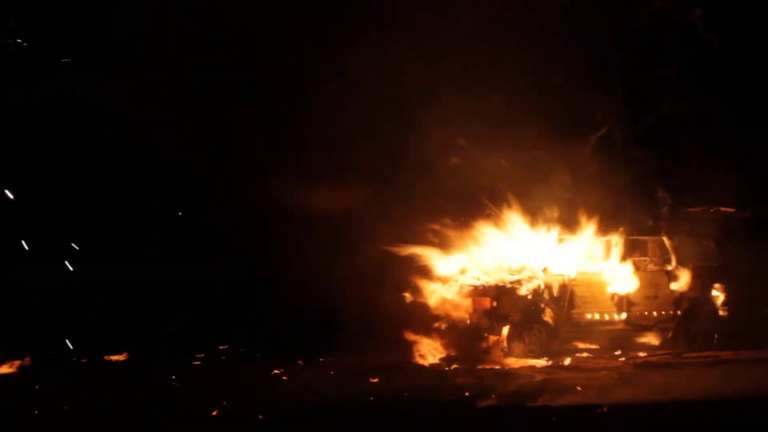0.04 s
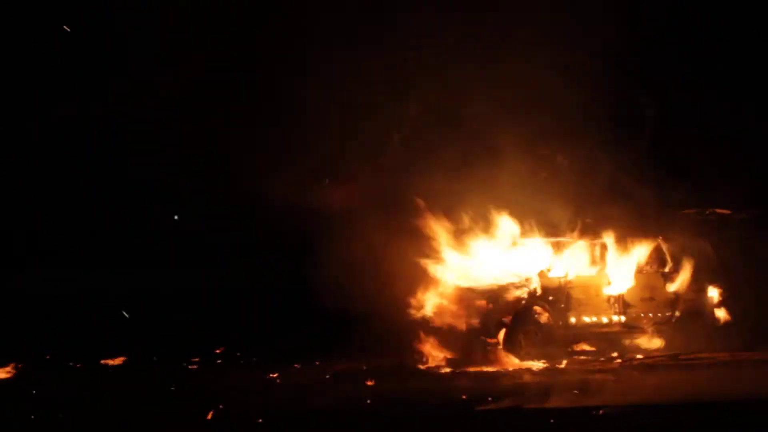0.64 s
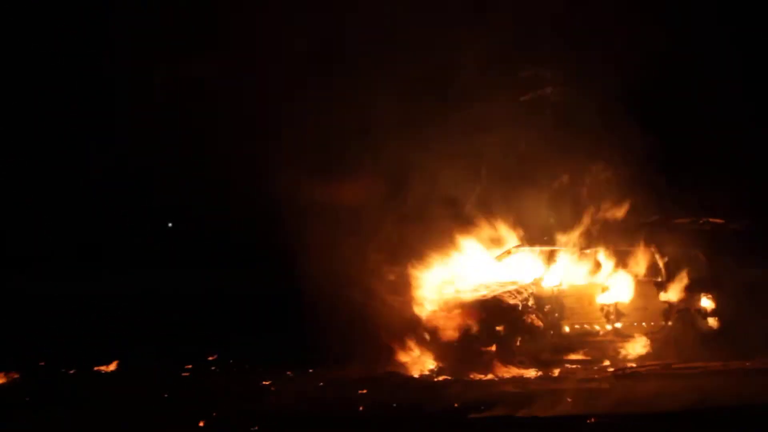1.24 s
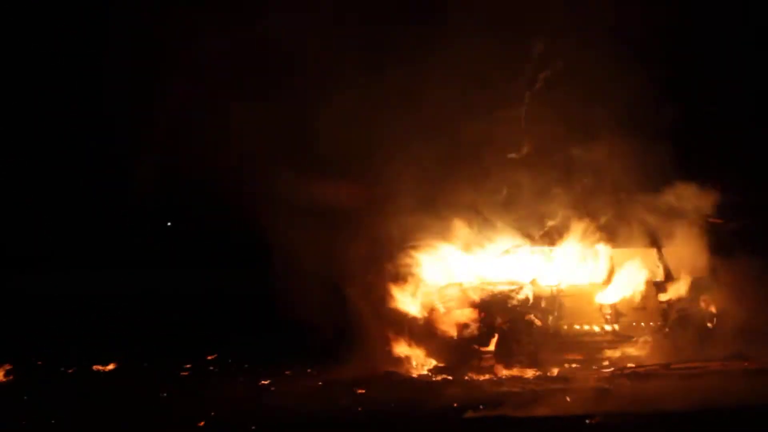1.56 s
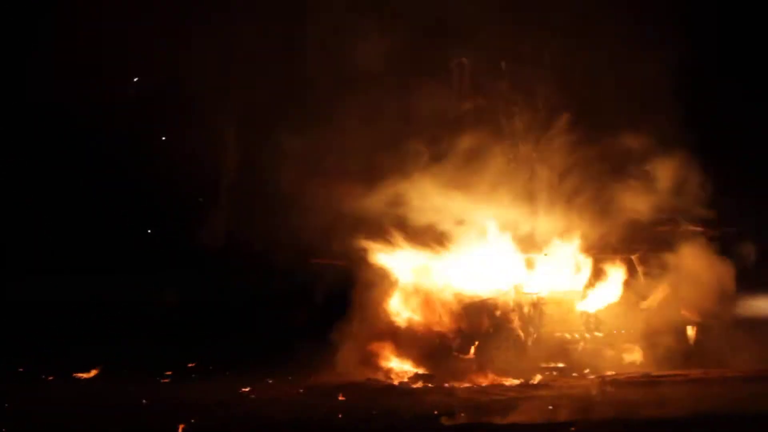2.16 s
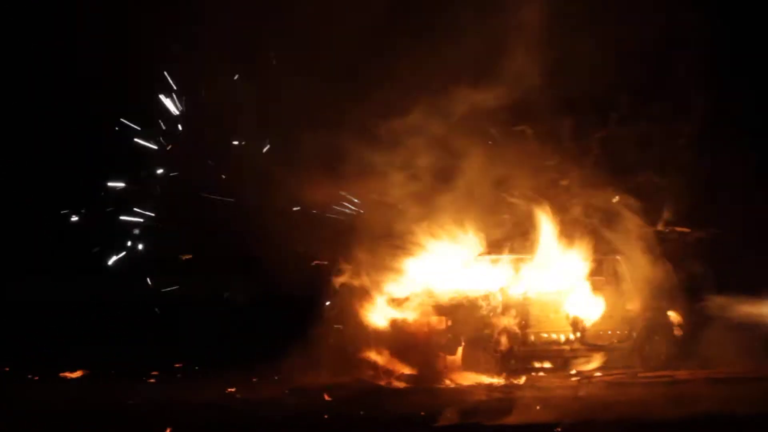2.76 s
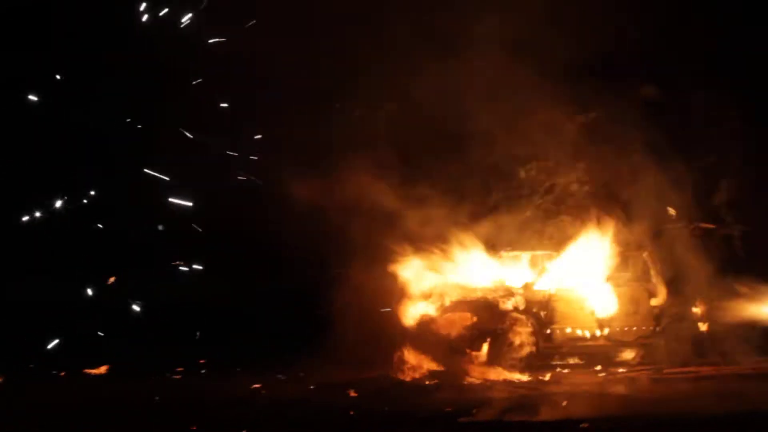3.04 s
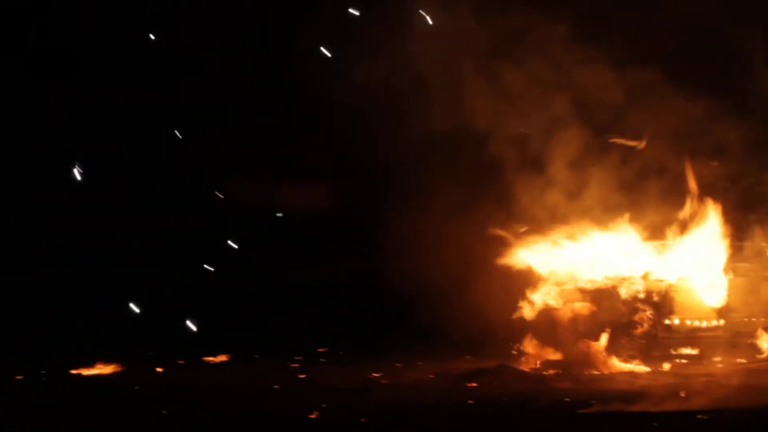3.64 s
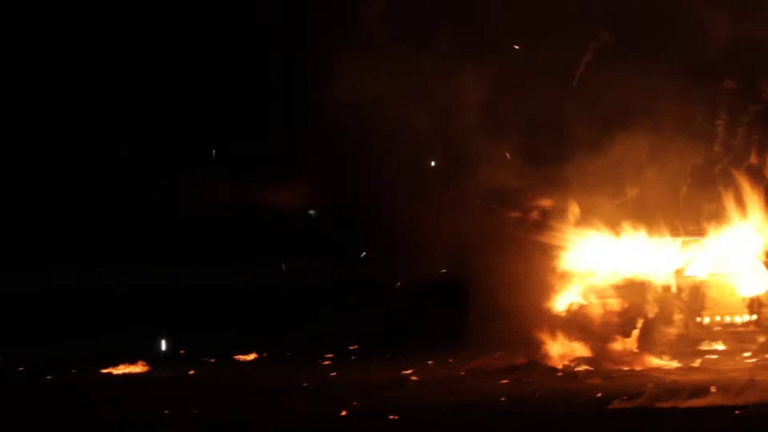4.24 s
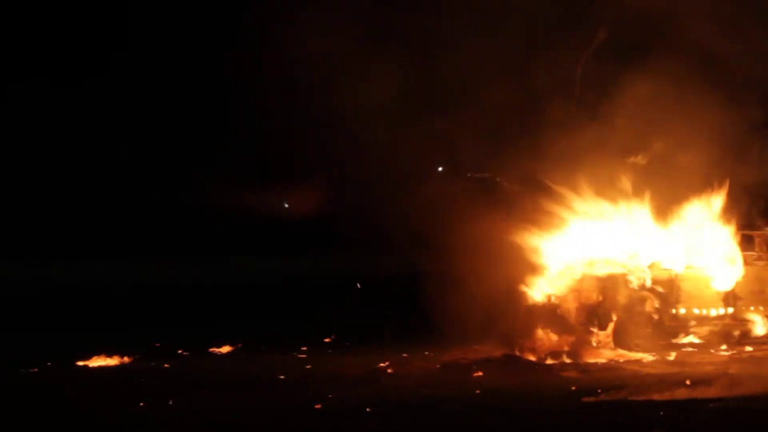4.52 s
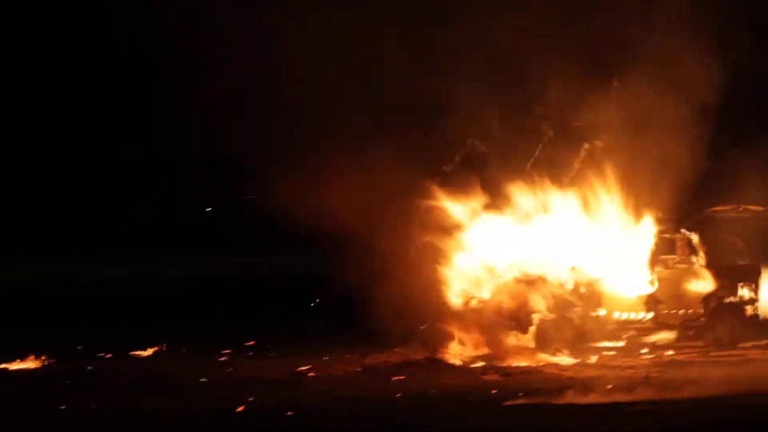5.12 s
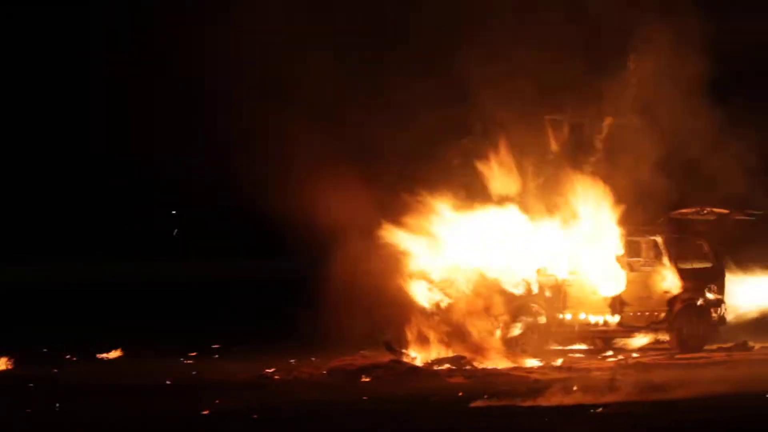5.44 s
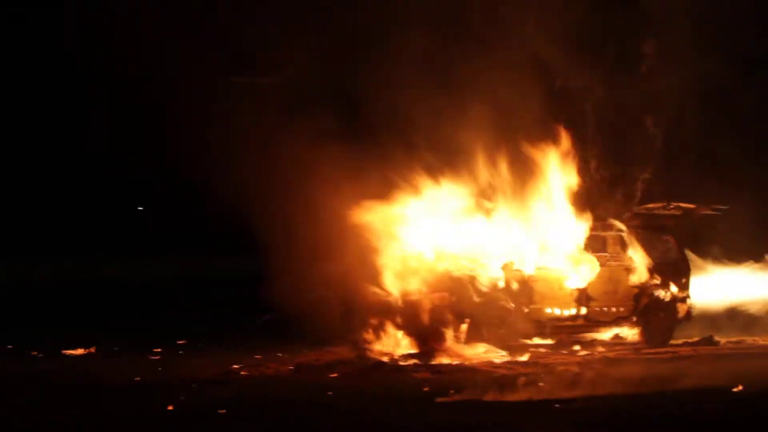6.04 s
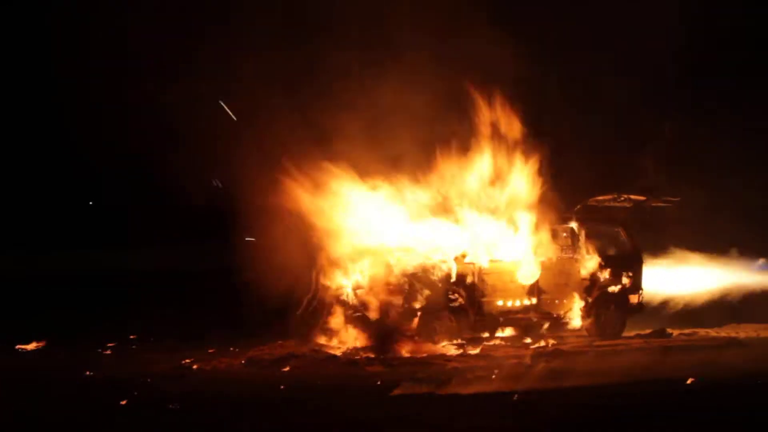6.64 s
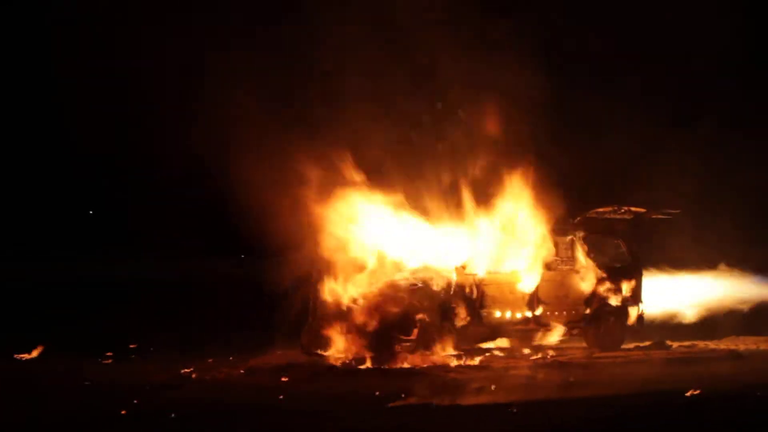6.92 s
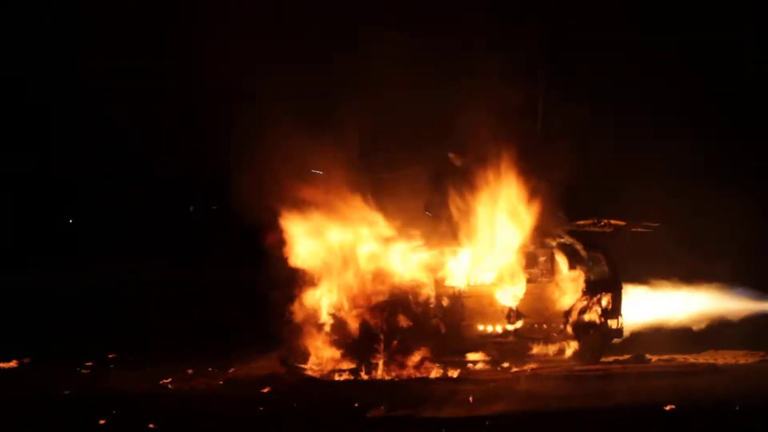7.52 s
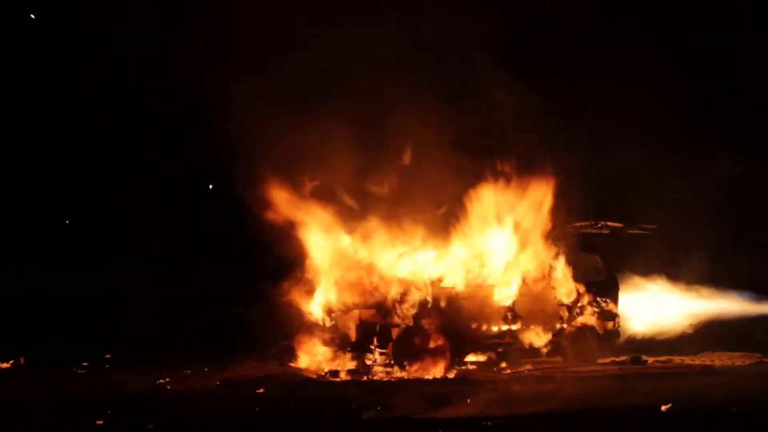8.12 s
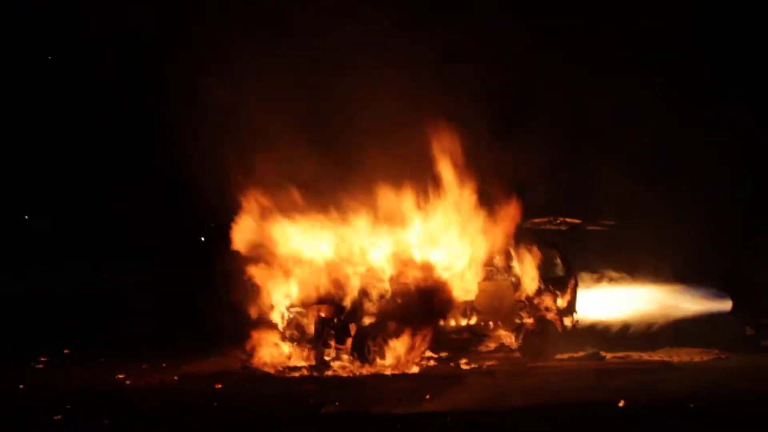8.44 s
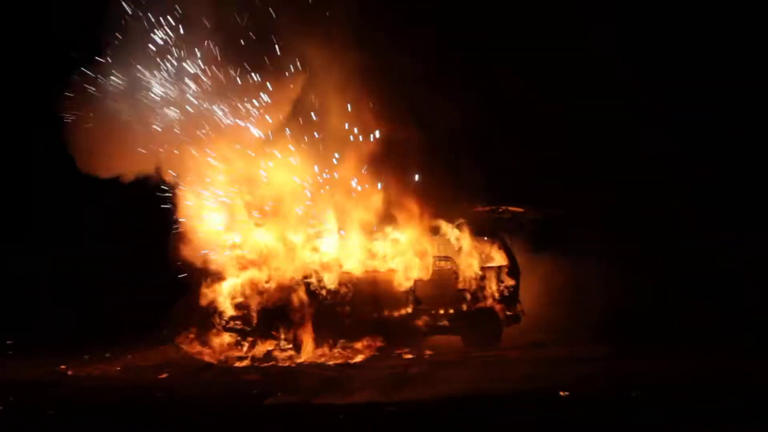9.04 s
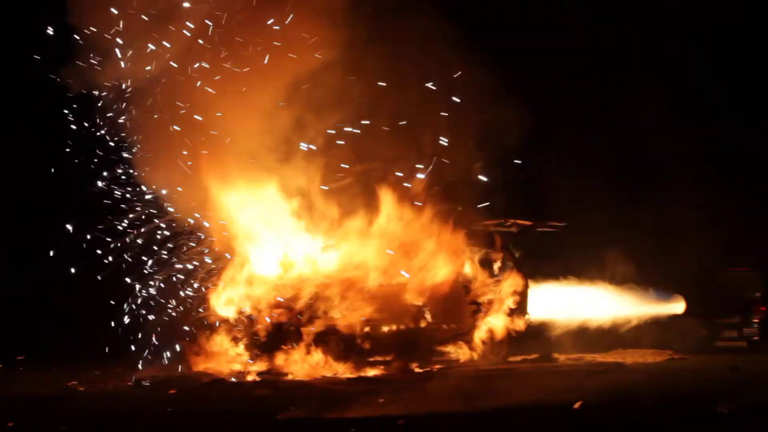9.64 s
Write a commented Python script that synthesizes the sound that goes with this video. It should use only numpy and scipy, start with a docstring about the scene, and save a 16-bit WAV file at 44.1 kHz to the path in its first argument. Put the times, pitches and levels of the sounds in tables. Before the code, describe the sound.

A jet engine idles outdoors, heard from one fixed microphone: a quiet low rumble, flickering air hiss, a high unsteady whistle and a lower howl that swells at about 1.4 seconds. At 2.1 seconds the afterburner lights with a sharp bang that overloads the microphone. The howl stops and a deep, billowing roar takes over. Around 3 seconds the whistle breaks into a rough hiss and becomes a fluttering turbine whine, which slides down in pitch, quickly at first and then slowly, growing more prominent with brief surges. The sound dips for an instant near 4.7 seconds. At 8.8 seconds the flame goes out with a short pop and the roar fades, leaving whine and hiss. At 9.3 seconds it relights with a second overloading bang, and the roar continues, the whine rising slightly, until the end at about 9.9 seconds.

```python
"""A truck-mounted jet engine blasts a burning van, outdoors at night, heard from one fixed microphone.
At idle it rumbles, air hisses through it, the duct howls and the compressor whistles. The afterburner
lights with a bang and roars while the turbine whine slides down, fluttering in the hot air.
Near the end the flame goes out with a pop and relights; both bangs are close enough to overload the mic."""
import sys
import numpy as np
from scipy.fft import rfft, irfft, next_fast_len
from scipy.io import wavfile
from scipy.ndimage import uniform_filter1d, map_coordinates

SR = 44100
rng = np.random.default_rng(int(sys.argv[2]) if len(sys.argv) > 2 else 0)


def int16_out(signal):
    """Quantize to a 16-bit WAV file."""
    q = np.round(np.clip(np.atleast_2d(signal).T, -1, 1) * 32767)
    wavfile.write(sys.argv[1], SR, q.astype(np.int16))


N = 435266
TIME = np.arange(N) / SR


def amp(db):
    """Decibels to gain."""
    return 10 ** (np.asarray(db) / 20)


def unit(x):
    """Scale to rms 1."""
    return x / np.sqrt(np.mean(np.abs(x) ** 2) + 1e-20)


def curves(rows):
    """One value per sample for each column after the time."""
    times, *columns = np.transpose(rows)
    return [np.interp(TIME, times, column) for column in columns]


def during(rows, fade_s):
    """1 while a table lasts, fading to 0 outside it."""
    return np.clip(1 + np.minimum(TIME - rows[0][0], rows[-1][0] - TIME) / fade_s, 0, 1)


def wobble(rate):
    """A smooth random curve, rate knots a second."""
    return map_coordinates(rng.standard_normal(int(N * rate / SR) + 4), [TIME * rate])


def filtered(x, response):
    """Filter x by a gain given as a function of frequency."""
    size = next_fast_len(N + 8192)
    return irfft(rfft(x, size) * response(np.fft.rfftfreq(size, 1 / SR)), size)[:N]


def rush(spectrum):
    """Noise of rms 1 with the given colour."""
    knots_hz, db = np.transpose(spectrum)
    colour = lambda hz: amp(np.interp(np.log(hz + 1), np.log(knots_hz), db, left=-120, right=-120))
    return unit(filtered(rng.standard_normal(N), colour))


def scatter(width_hz, slope, reach_hz=800):
    """Random complex gain of a tone that has crossed turbulent air; sidebands fade beyond reach_hz."""
    skirt = lambda hz: (1 + (hz / width_hz) ** 2) ** (-slope / 2) * np.exp(-(hz / reach_hz) ** 2)
    return unit(filtered(rng.standard_normal(N), skirt) + 1j * filtered(rng.standard_normal(N), skirt))


def tone(pitch_hz, gain):
    """A sine of rms 1 on a pitch curve, times a complex gain."""
    return np.sqrt(2) * np.real(gain * np.exp(2j * np.pi * np.cumsum(pitch_hz) / SR))


# combustion at idle: (time [s], relative level [dB])
RUMBLE_LEVEL = [(0, -28.5), (.55, -23.5), (1.25, -25), (1.65, -29), (2.05, -27)]
# its colour: (frequency [Hz], level [dB])
RUMBLE_SPECTRUM = [(25, -26), (50, -12), (90, -3.5), (150, 5), (215, 2), (310, -0.5), (400, -8), (500, -15),
                   (620, -39), (1200, -70)]
def idle_rumble():
    """Combustion rumbles quietly until the afterburner lights."""
    db, = curves(RUMBLE_LEVEL)
    return (TIME < FLAME_BURNS[0][0]) * amp(db + 2) * rush(RUMBLE_SPECTRUM)


# air flow, relative levels: (time [s], exhaust [dB], intake [dB], fizz [dB])
AIR_LEVELS = [(0, -41, -27, -32.5), (.2, -39, -27, -30), (.95, -37, -25, -27), (1.3, -41.5, -26.5, -27.5),
              (2.08, -39, -26.5, -29.5), (2.35, -39, -31.5, -35.5), (2.95, -40, -30.5, -34.5),
              (3.5, -41.5, -33, -38.5), (4.6, -43.5, -35, -38.5), (5.15, -45.5, -37.5, -45.5),
              (5.6, -45, -36, -43.5), (6.95, -44, -35.5, -41), (7.3, -46, -38, -45.5),
              (7.85, -44.5, -35, -43), (8.55, -45.5, -37.5, -45), (8.85, -40.5, -33.5, -40.5),
              (9.87, -43, -33, -39.5)]
# its four bands at the mic, low to high: (frequency [Hz], level [dB])
EXHAUST_SPECTRUM = [(350, -4), (600, -13), (720, -1), (1000, 0), (1400, -0.5), (1800, -8), (2600, -31),
                    (5000, -71)]
INTAKE_SPECTRUM = [(1200, -13), (1750, -10), (2100, -1.5), (2300, -1), (2600, -4), (3100, 4), (3500, 0),
                   (3950, -6.5), (4350, 2), (4700, -12.5), (5400, -32), (8000, -85.5)]
FIZZ_SPECTRUM = [(2000, -24), (3200, -13.5), (4300, -10.5), (4800, -8.5), (5150, 0.5), (5450, -4.5),
                 (5800, 5.5), (6200, -3.5), (6600, -9), (7000, -9.5), (7550, -10), (8000, -18.5),
                 (8600, -35), (11000, -68)]
SIZZLE_SPECTRUM = [(6000, -26), (8000, 0.5), (8500, 2), (9200, 5), (9700, 1), (10400, 2.5), (11300, -5),
                   (12200, -4), (12600, -4), (12950, 0.5), (13600, -4), (14500, -10), (15200, -12.5),
                   (16000, -3)]
def airflow():
    """Exhaust and intake noise flicker together in the hot air, the treble also on its own."""
    exhaust_db, intake_db, fizz_db = curves(AIR_LEVELS)
    shared_db = recoil_db() + 0.44 * wobble(9.1) + 0.77 * wobble(26) + 0.59 * wobble(55)
    exhaust = amp(exhaust_db + 3 + shared_db) * rush(EXHAUST_SPECTRUM)
    intake = amp(intake_db + 6 + shared_db + 0.21 * wobble(25)) * rush(INTAKE_SPECTRUM)
    fizz = amp(fizz_db + 3 + shared_db + 0.28 * wobble(40)) * rush(FIZZ_SPECTRUM)
    sizzle_db = 1.027 * fizz_db - 14  # faster air is brighter
    sizzle = amp(sizzle_db + shared_db + 0.73 * wobble(40)) * rush(SIZZLE_SPECTRUM)
    return exhaust + intake + fizz + sizzle


# the duct's howl: (time [s], pitch [Hz])
HOWL_HZ = [(0, 1510), (.25, 1472), (.55, 1535), (.85, 1533), (1.15, 1495), (1.3, 1512), (1.42, 1425),
           (1.53, 1358), (1.66, 1360), (1.88, 1337), (2.1, 1332)]
# its swells: (time [s], level [dB])
HOWL_LEVEL = [(0, -34.5), (.45, -36), (.8, -29), (1.1, -37), (1.37, -35), (1.41, -22.5), (2.1, -21.5)]
def duct_howl():
    """At idle the duct howls and the air flow rings its resonance; a thin, steady whine sits far above."""
    hz, db = curves(HOWL_HZ) + curves(HOWL_LEVEL)
    howl = tone(hz, 0.92 + 0.33 * scatter(22, slope=1.1))
    howl += amp(-10.5) * tone(hz + 60, scatter(45, slope=2.2))  # a rough shoulder just above the howl
    howl += amp(-12.5) * tone(2 * hz, scatter(40, slope=3.2))
    resonance = amp(-38) * tone(np.full(N, 1367), scatter(16, slope=0.99))
    thin_whine = amp(-55) * tone(np.full(N, 12925), scatter(130, slope=1.4))
    return (amp(db) * howl + resonance + thin_whine) * during(HOWL_HZ, fade_s=0.01)


# the compressor's whistle: (time [s], pitch [Hz])
WHISTLE_HZ = [(0, 5320), (.3, 5228), (.7, 5228), (1, 5250), (1.5, 5210), (2.1, 5205), (2.5, 5120),
              (2.83, 5108), (3, 4900)]
# its swells: (time [s], level [dB])
WHISTLE_LEVEL = [(0, -27.5), (.35, -19), (.7, -25), (1, -24), (1.45, -24), (1.65, -20.5), (1.92, -32),
                 (2.09, -24), (2.22, -39), (2.75, -23), (3, -31)]
def compressor_whistle():
    """The compressor whistles unsteadily, dying away as the rotor slows."""
    hz, db = curves(WHISTLE_HZ) + curves(WHISTLE_LEVEL)
    whistle = tone(hz, 0.67 + 0.54 * scatter(35, slope=1.04))
    octave = amp(-37) * tone(2 * hz, scatter(45, slope=1.6))
    fade_out = np.clip((2.98 - TIME) / 0.28, 0, 1)
    return (whistle + octave) * fade_out * amp(db + 1.9 * wobble(14))


# afterburner ignitions: (time [s], pressure [dB], length [s], overpressure [0-1],
# first push gain [dB], hiss sag [dB], sag deepest after [s])
IGNITIONS = [(2.0915, 22, 0.012, 0.91, -3, 5, 0.096), (9.3108, 26, .0138, 0.6, -34, 4, 0.043)]
def bangs():
    """Each ignition reaches the mic as a push, a brief suction and a second push off the ground."""
    out = np.zeros(N)
    for start, db, length, overpressure, first_db, *_ in IGNITIONS:
        progress = np.clip((TIME - start) / length, 0, 1)
        wave = np.sin(np.pi * progress) ** 2 * (np.cos(2 * np.pi * progress) + overpressure)
        first_push = (progress < 0.5) & (wave > 0)
        out += amp(db + first_db * first_push) * wave
    return out


def recoil_db(flare_db=3, flare_s=0.025):
    """The hiss flares with each bang, then sags and recovers."""
    db = np.zeros(N)
    for start, *_, sag_db, sag_s in IGNITIONS:
        age = np.maximum(TIME - start, 0)
        db += (TIME > start) * flare_db * np.exp(-age / flare_s)
        db -= sag_db * (age / sag_s) ** 2 * np.exp(2 - 2 * age / sag_s)
    return db


# afterburner burns: (lights [s], starts to starve [s], upper roar flare [dB], flare decay [s])
FLAME_BURNS = [(2.0925, 8.8, 8, 0.79), (9.335, 9.87, 2, 0.37)]
# the flame's two bands at the mic: (frequency [Hz], level [dB])
DEEP_SPECTRUM = [(12, -36), (25, -24), (50, -9), (90, -3), (140, -1), (180, -2.5), (230, -13.5),
                 (350, -31.5), (600, -97)]
UPPER_SPECTRUM = [(80, -39), (140, -5.5), (190, -0.5), (240, 1), (310, -6), (400, -15.5), (500, -25.5),
                  (620, -38), (1200, -72)]
def afterburner_roar(deep_db=-15, upper_db=-22, build_db=5, build_s=0.41):
    """The flame flares as it lights, deepens and billows; it fades when starved."""
    deep, upper = np.zeros(N), np.zeros(N)
    for start, starve, flare_db, flare_s in FLAME_BURNS:
        age, starved_s = np.maximum(TIME - start, 0), np.maximum(TIME - starve, 0)
        lit = np.clip(age / 0.0027, 0, 1)
        deep += lit * amp(deep_db - build_db * np.exp(-age / build_s) - 26 * starved_s)
        upper += lit * amp(upper_db + flare_db * np.exp(-age / flare_s) - 23 * starved_s)
    billow = amp(1.06 * wobble(30))
    return billow * (deep * rush(DEEP_SPECTRUM) + upper * rush(UPPER_SPECTRUM))


# puffs of flame: (time [s], level [dB], time to fall 60 dB [s])
FLAME_POPS = [(2.102, -11, 0.47), (8.796, 4, 0.04), (9.304, -2, 0.045)]
# their colour: (frequency [Hz], level [dB])
POP_SPECTRUM = [(30, -5), (120, 10.5), (260, -1.5), (600, -29), (1300, -18.5), (3000, -20), (9000, -52)]
def flame_pops(attack_s=0.0064):
    """The flame puffs as it lights and as it goes out."""
    envelope = np.zeros(N)
    for start, db, t60 in FLAME_POPS:
        age = np.maximum(TIME - start, 0)
        envelope += amp(db - 60 * age / t60) * np.minimum(age / attack_s, 1)
    return envelope * rush(POP_SPECTRUM)


# the whistle breaking up into hiss: (time [s], centre [Hz], level [dB])
ROTOR_HISS = [(2.4, 5140, -35), (2.8, 5120, -31), (3.0, 4870, -27.5), (3.15, 4550, -29), (3.35, 4290, -32),
              (3.6, 4240, -46), (4.2, 4070, -25), (4.9, 4085, -35.5)]
def rotor_hiss():
    """The slowing rotor sheds a rough, pitched hiss with falling overtones."""
    hz, db = curves(ROTOR_HISS)
    hiss = tone(hz, scatter(320, slope=1.1))
    hiss += amp(-42) * tone(2 * hz, scatter(480, slope=1.6))
    hiss += amp(-41.5) * tone(3 * hz, scatter(520, slope=1.8))
    return amp(db + 1.1 * wobble(40)) * during(ROTOR_HISS, fade_s=0.25) * hiss


# a second blade row: (time [s], pitch [Hz], level [dB])
BLADE_SWEEP = [(3.2, 4810, -43), (3.35, 4514, -21.5), (3.5, 4320, -20.5), (3.63, 4200, -25.5),
               (4.1, 4100, -53), (4.5, 4056, -22.5), (5.1, 3846, -29.5), (5.6, 3670, -23)]
def blade_sweep():
    """The tone of a second blade row sweeps down and joins the turbine whine."""
    hz, db = curves(BLADE_SWEEP)
    return amp(db) * during(BLADE_SWEEP, fade_s=0.28) * tone(hz, 0.5 + 0.87 * scatter(44, slope=0.75))


# the turbine's whine: (time [s], pitch [Hz])
TURBINE_HZ = [(3.05, 4650), (3.2, 4440), (3.35, 4190), (3.65, 4115), (4.05, 4060), (4.4, 3960), (4.7, 3870),
              (5.0, 3800), (5.3, 3742), (5.8, 3655), (6.3, 3592), (6.8, 3535), (7.3, 3480), (7.93, 3436),
              (8.5, 3410), (8.87, 3396), (9.33, 3432), (9.87, 3487)]
# its swells at the mic: (time [s], level [dB])
TURBINE_LEVEL = [(3.2, -28), (3.45, -34.5), (3.75, -24), (4.5, -25), (5.15, -25), (5.75, -28.5),
                 (6.15, -20.5), (6.85, -21.5), (7.25, -18.5), (7.6, -19.5), (7.8, -27.5), (8.1, -19),
                 (8.8, -21), (9.0, -16), (9.27, -16), (9.45, -23), (9.87, -18)]
# its strongest brief surges: (time [s], gain [dB])
TURBINE_SURGES = [(4.77, 11), (5.12, 9), (7.18, 3), (7.61, 3), (7.81, 8), (7.99, 5.5), (8.13, 6), (8.39, 5),
                  (8.55, 5.5), (8.63, 7), (8.97, 5), (9.22, 4.5), (9.85, 6.5)]
# its overtones: (multiple [x pitch], clear tone [dB], haze [dB], haze width [Hz])
OVERTONES = [(2, 0.5, 0, 240), (3, -21, -19, 150), (4, -20, -27, 230)]
# hiss of a faster blade row: (time [s], level [dB])
FAST_ROW_LEVEL = [(4.0, -70), (4.3, -59), (5.0, -49), (5.9, -47), (6.6, -49), (8.7, -45.5), (9.25, -35.5),
                  (9.45, -45.5)]
def turbine_whine(settled_hz=3370, surge_s=0.02, treble_loss_hz=14300):
    """Blade tones cross the plume to the mic; it makes them flutter and spreads a haze around each."""
    hz, db, fast_row_db = curves(TURBINE_HZ) + curves(TURBINE_LEVEL) + curves(FAST_ROW_LEVEL)
    excess_khz = (hz - settled_hz) / 1000
    swell_db = db - np.mean(TURBINE_LEVEL, axis=0)[1]
    # the whine steadies while the flame is out and as the rotor settles
    flame_out = (TIME > FLAME_BURNS[0][1]) & (TIME < FLAME_BURNS[1][0])
    heat = uniform_filter1d(np.where(flame_out, 0.45, 1.0), SR // 5)
    scattered = np.clip(heat * (0.51 + 0.37 * excess_khz), 0, 1)
    flutter = lambda: np.sqrt(1 - scattered ** 2) + scattered * scatter(40, slope=1.25)
    twinkle = np.clip(1 + heat * 0.3 * wobble(40), 0.1, 1.5)  # eddies focus and defocus the tone
    surge_db = sum(gain_db * np.exp(-((TIME - at) / surge_s) ** 2) for at, gain_db in TURBINE_SURGES)
    clear = amp(db + surge_db) * twinkle * flutter()
    haze = amp(-32 + 0.5 * swell_db) * scatter(140, slope=3.13)
    out = tone(hz, clear + haze)
    # overtones share part of each swell and are weaker while the rotor is fast
    overtone_db = -44 + 0.44 * swell_db - 4.5 * excess_khz + 1.6 * wobble(8)
    for multiple, clear_db, haze_db, width_hz in OVERTONES:
        overtone_hz = round(multiple) * hz
        gain = amp(clear_db) * flutter() + amp(haze_db) * scatter(width_hz, slope=0.59)
        loss_db = 5 * np.maximum(overtone_hz - treble_loss_hz, 0) / 1000  # the highest overtones are dulled in the treble
        drift_db = 1.8 * wobble(4) + 1.1 * wobble(28)  # each drifts in loudness on its own
        out += amp(overtone_db + drift_db - loss_db) * tone(overtone_hz, gain)
    out += amp(fast_row_db + 1.3 * wobble(35)) * tone(2.322 * hz, scatter(410, slope=0.43))
    return out * during(TURBINE_LEVEL, fade_s=0.18)


def scene(dip_at_s=4.676, dip_db=14, dip_width_s=0.023):
    """Engine and flame from one spot in the open air; midway the level dips briefly."""
    engine = idle_rumble() + airflow() + duct_howl() + compressor_whistle()
    engine += afterburner_roar() + rotor_hiss() + blade_sweep() + turbine_whine()
    dip = amp(-dip_db * np.exp(-((TIME - dip_at_s) / dip_width_s) ** 2))
    return (dip * engine + bangs() + flame_pops())[None]


def record(dry, rail=1.25, bass_cut_hz=108, top_hz=15720):
    """The mic saturates on the bangs; its bass cut makes the flat tops droop, and the recorder clips."""
    saturated = dry[0] / (1 + np.abs(dry[0] / rail) ** 4) ** (1 / 4)
    drooped = filtered(saturated, lambda hz: 1j * hz / (bass_cut_hz + 1j * hz))
    clipped = np.clip(drooped, -1, 1)
    return filtered(clipped, lambda hz: hz < top_hz)[None]


dry = scene()
out = record(dry)
int16_out(out)
```